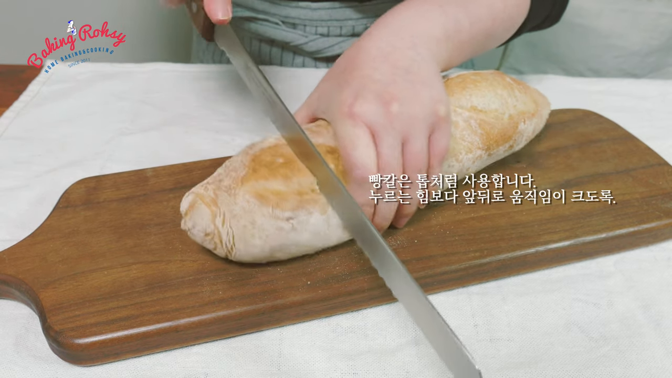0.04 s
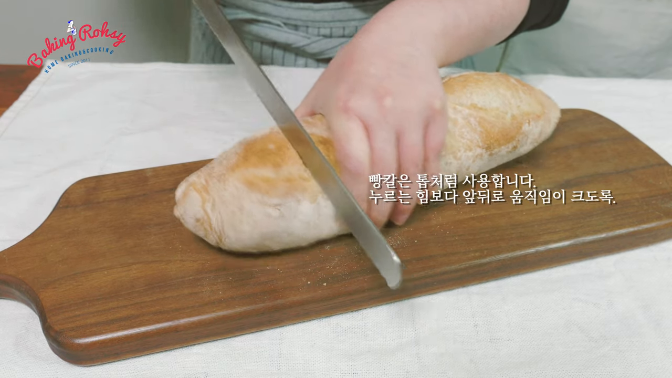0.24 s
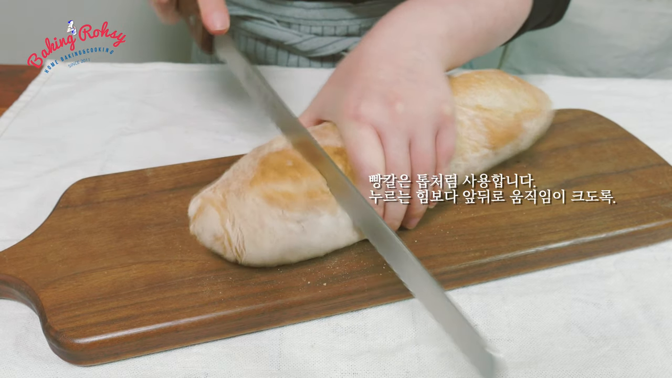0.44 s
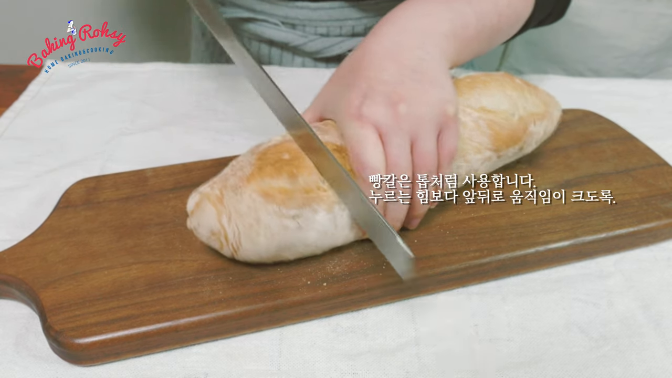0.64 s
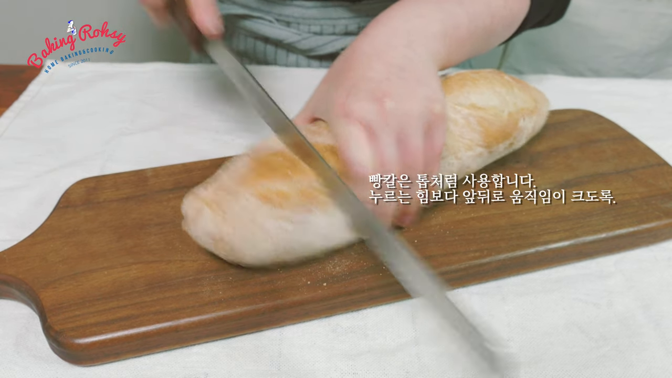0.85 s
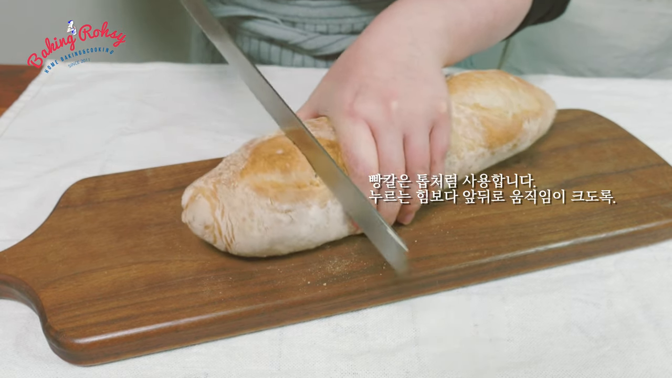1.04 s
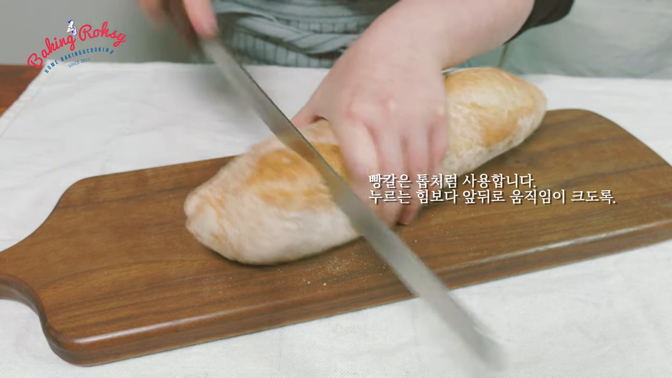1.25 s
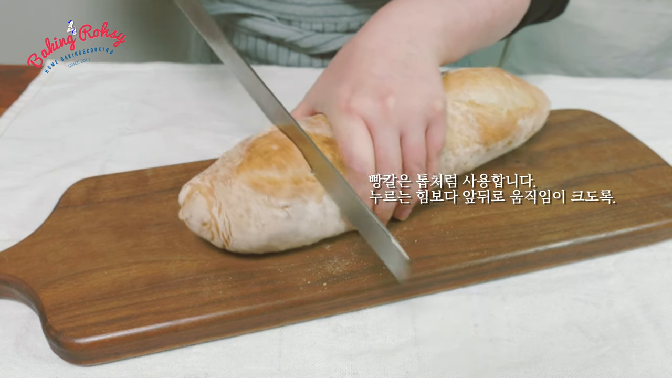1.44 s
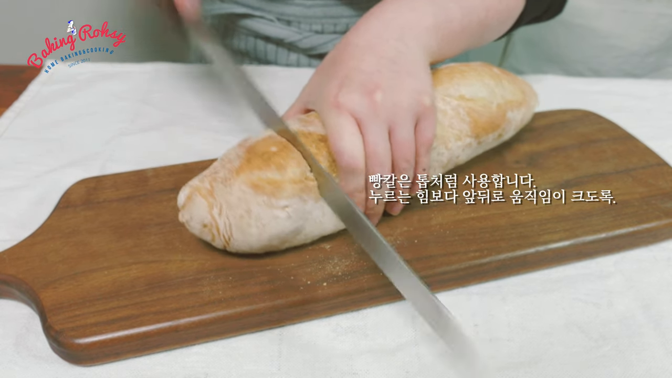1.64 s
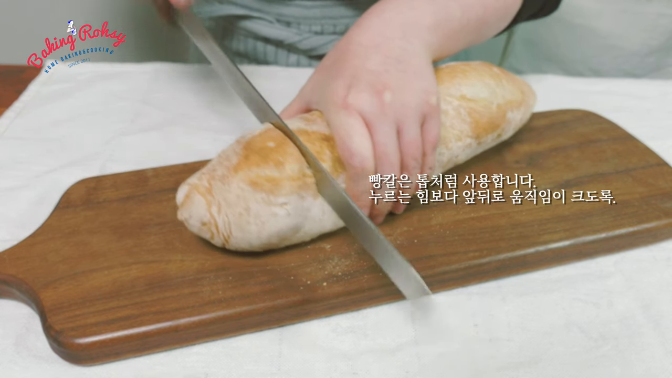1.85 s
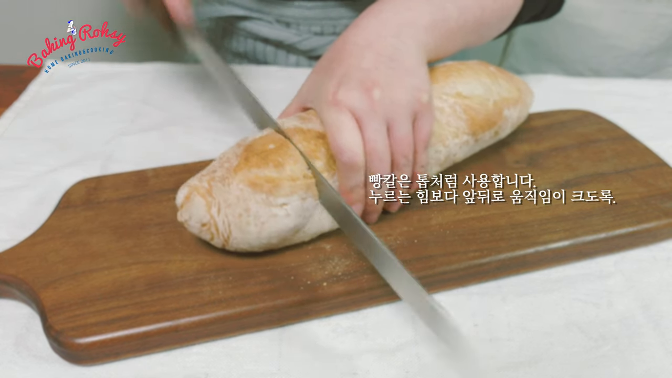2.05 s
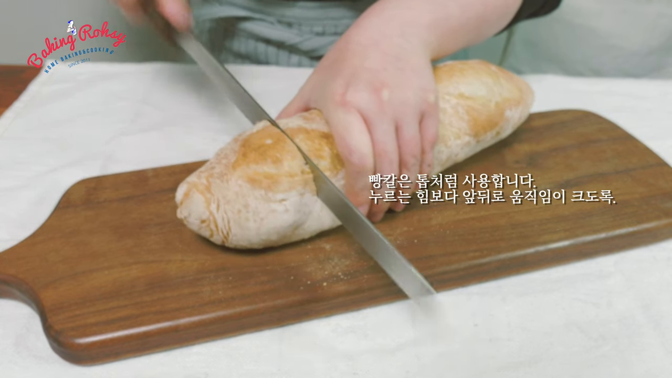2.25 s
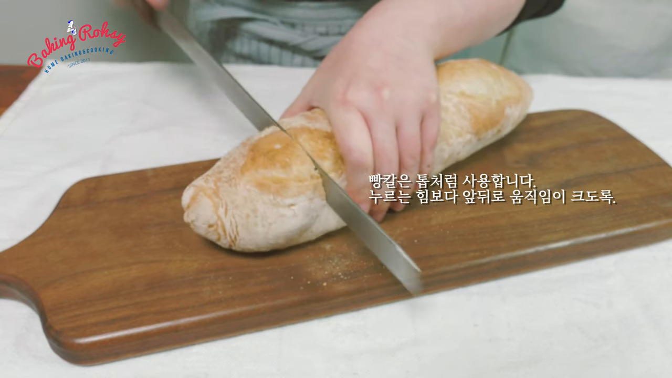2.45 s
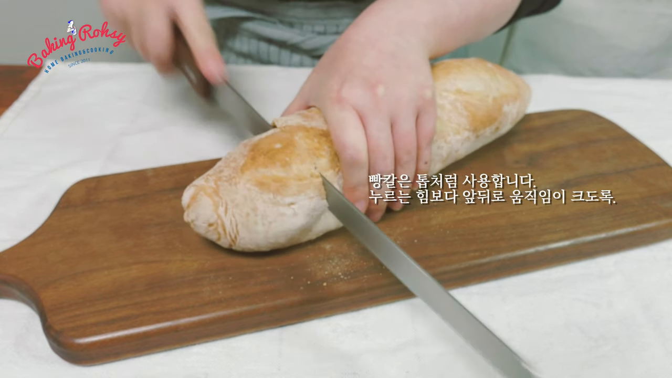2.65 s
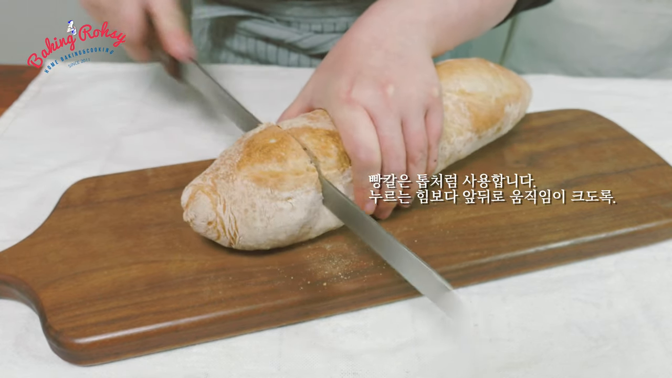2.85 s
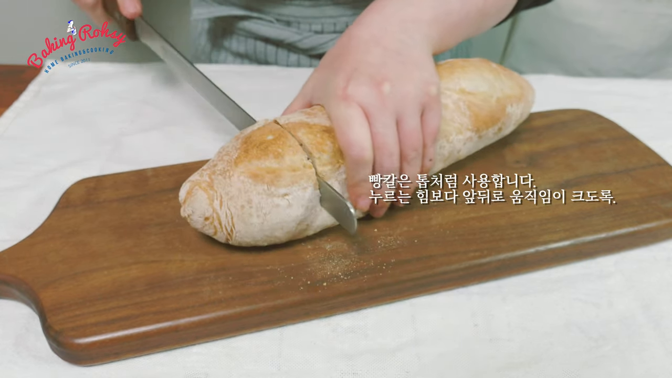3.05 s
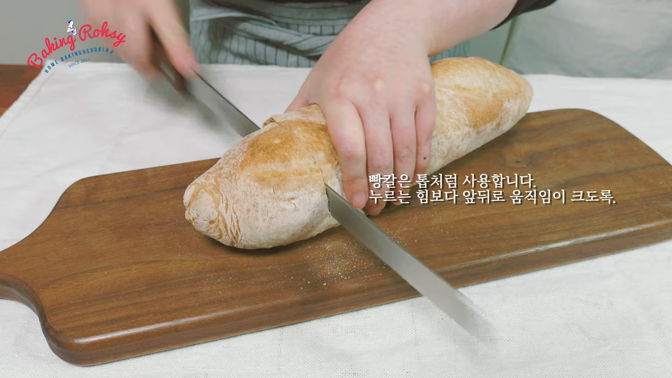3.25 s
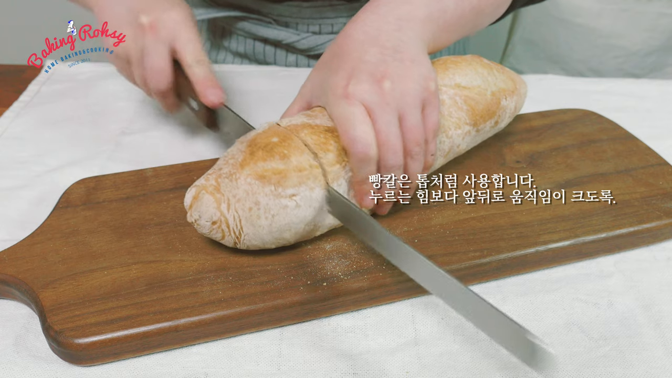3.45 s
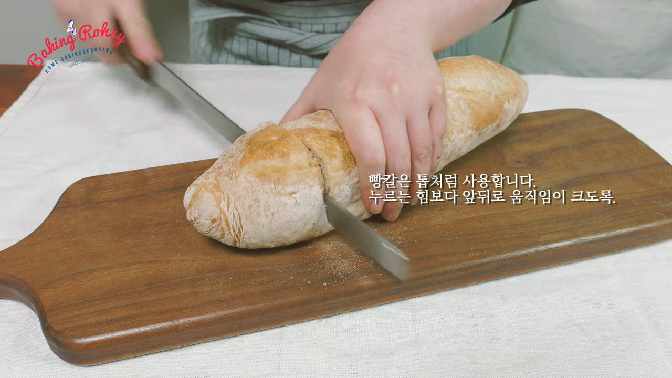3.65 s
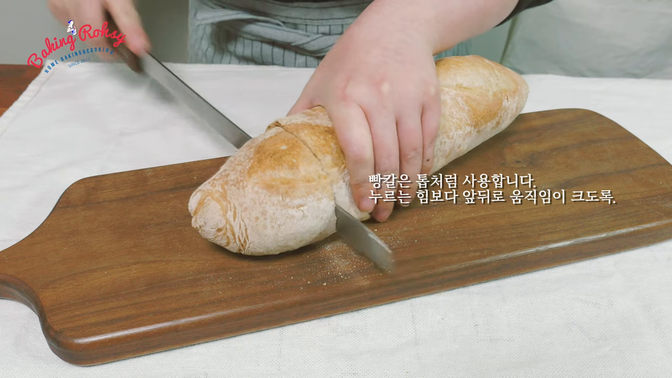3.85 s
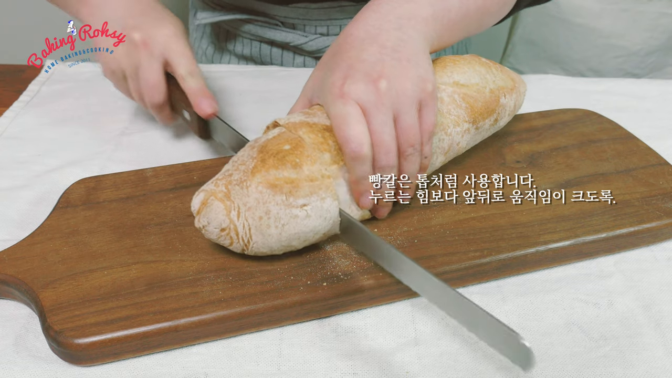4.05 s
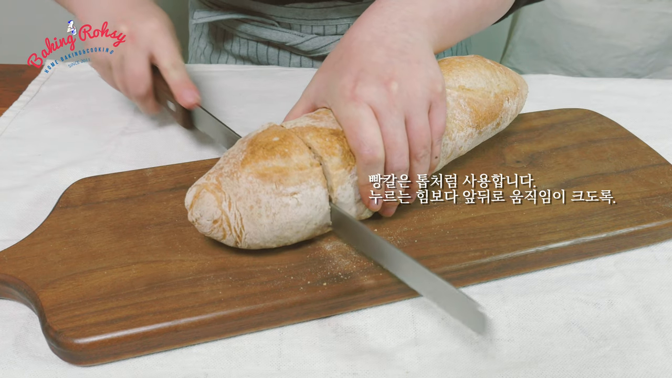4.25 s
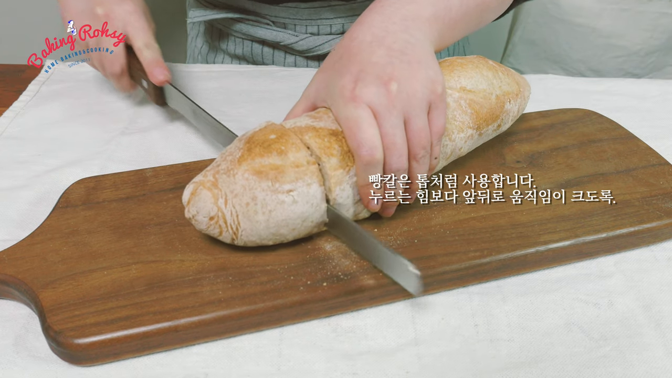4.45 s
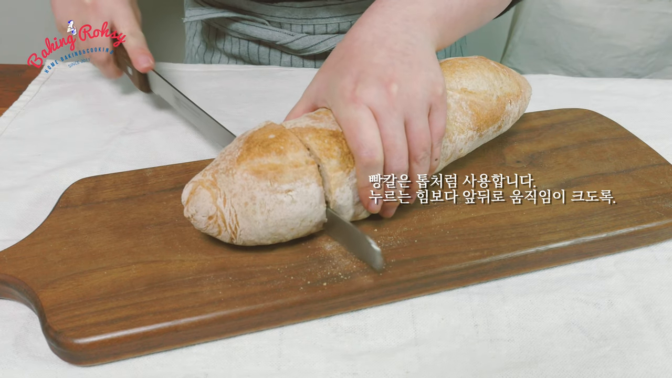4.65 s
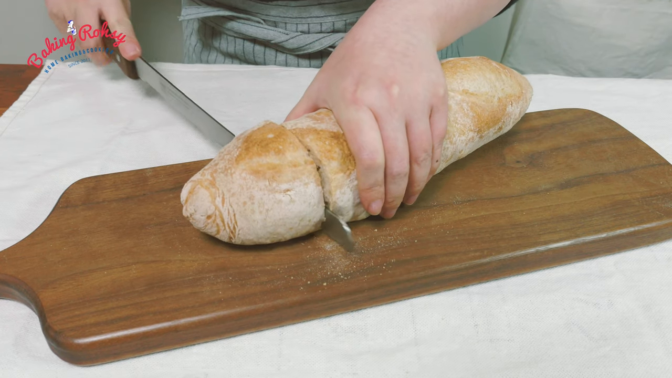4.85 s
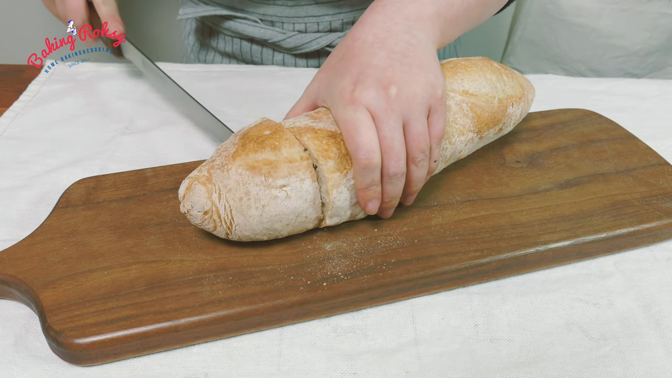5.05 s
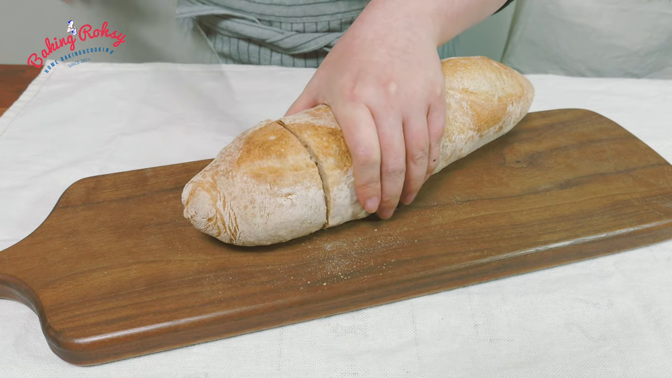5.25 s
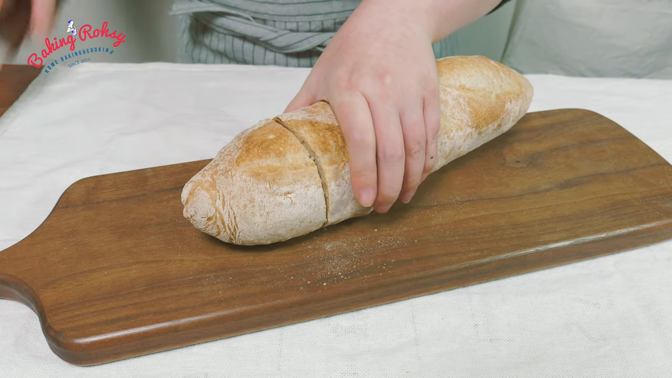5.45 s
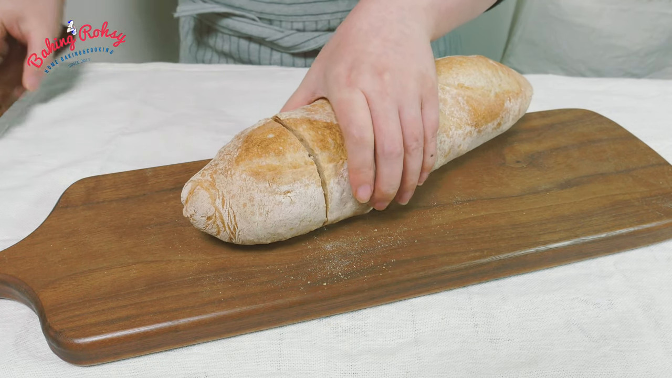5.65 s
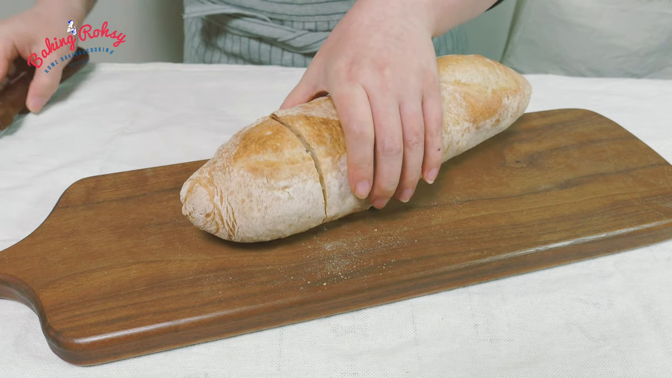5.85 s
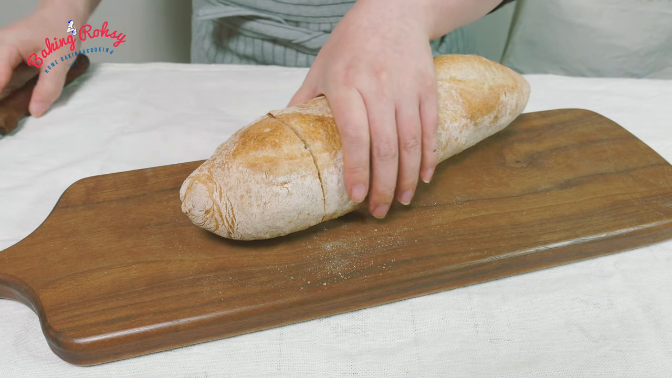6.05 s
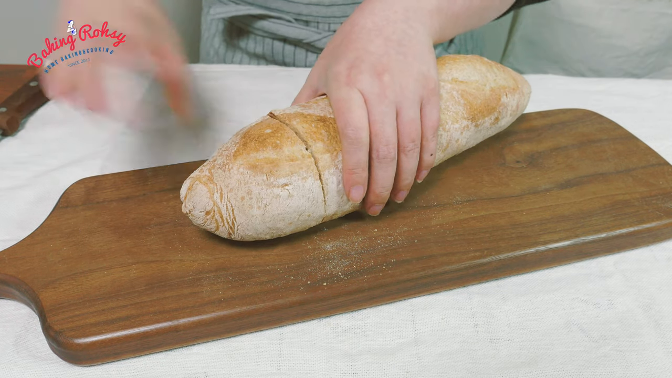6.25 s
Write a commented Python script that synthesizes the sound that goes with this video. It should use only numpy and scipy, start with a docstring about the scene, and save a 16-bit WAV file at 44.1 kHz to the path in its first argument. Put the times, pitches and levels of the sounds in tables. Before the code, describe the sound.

A serrated knife saws through a crusty loaf with rasping, crackling strokes, then is laid on the table with two ringing knocks.

```python
"""A serrated knife saws through a crusty loaf on a wooden board, close by in a small kitchen.
Its teeth catch and let go, making tiny breaks that rasp in the crust and shake the loaf and board.
Short strokes crack the crust, longer ones rasp through the loaf. Then the blade slides out, fingers
rustle on the crust, and the knife is laid down with two ringing knocks.
The sound arrives twice, a few milliseconds apart, which makes it hollow."""
import sys
import numpy as np
from scipy import signal
from scipy.fft import rfft, irfft
from scipy.io import wavfile

SR = 44100
rng = np.random.default_rng(int(sys.argv[2]) if len(sys.argv) > 2 else 0)


def log_audio(samples):
    """Write samples as a 16-bit WAV file to the path given in sys.argv[1]."""
    # one column per channel
    frames = np.atleast_2d(samples).T
    # limit to full scale, then quantise
    limited = np.clip(frames, -1, 1)
    pcm = np.round(limited * 32767).astype(np.int16)
    wavfile.write(sys.argv[1], SR, pcm)


N = 278271
TIME, HZ = np.arange(N) / SR, np.fft.rfftfreq(8192, 1 / SR)

# Tone colours, as the strength of each pitch: f/Hz, level/dB
BACKGROUND_TONE = [(25, -18), (70, -11.5), (130, 7), (200, 4), (290, 5.5), (400, 4), (550, 10.5),
                   (720, -3.5), (1000, -4.5), (1600, -10), (3000, -20), (6000, -30), (10000, -36),
                   (14000, -47)]  # the quiet kitchen
CLATTER_TONE = [(60, -10), (150, -1.5), (300, -0.5), (1000, 8), (1300, 3), (1600, 6.5), (2000, 1.5),
                (3000, 3.5), (3800, -0.5), (5500, -7.5), (6500, -5.5), (9000, -11.5), (11000, -16.5),
                (14000, -45)]  # the struck table
CRUMB_TONE = [(30, -23), (90, -6.5), (160, -0.5), (250, -6.5), (500, 6.5), (650, 10), (850, -0.5),
              (1500, -51.5)]  # the soft inside of the loaf
CRUST_TONE = [(350, -17.5), (600, -4), (770, 2), (870, 3), (930, 1.5), (1040, 1), (1200, -0.5), (1850, -2),
              (2100, -1), (3000, -0.5), (3700, -6.5), (4400, -20), (5300, -24.5), (8000, -58)]  # tearing crust
FIZZ_TONE = [(2500, -44), (3900, 0.5), (4700, 1.5), (5600, -3), (6500, 0.5), (7600, -6.5), (8800, -5.5),
             (9400, -9.5), (10300, -7.5), (11500, -16), (12500, -21), (13000, -40), (14200, -21)]  # fine crumbs
FLAKE_TONE = [(80, -29), (300, -14.5), (900, 14), (2000, 13), (3200, 13), (4500, 3), (8000, -12),
              (14000, -40)]  # a breaking flake
# How long the room takes to fade by 60 dB: f/Hz, fade/s
ROOM_FADE = [(150, 0.11), (600, 0.18), (3000, 0.15), (8000, 0.071), (14000, 0.055)]
# Strength of the echoes from the sides: f/Hz, level/dB
SIDE_ECHOES = [(60, -10), (140, -11.5), (280, -16), (550, -27.5), (850, -33), (1400, -12.5), (2100, -16.5),
               (2600, -26), (3400, -15.5), (4300, -19), (5100, -13), (6100, -20), (7100, -16.5),
               (12000, -6)]
# Fingers shift on the crust: t/s, half length/s, level/dB
FINGER_SHIFTS = [(5.428, 0.055, -65), (5.533, 0.032, -60), (5.77, 0.08, -68.5), (5.957, 0.041, -64.5),
                 (6.232, 0.073, -70)]
# The knife hits the table: t/s, ring/dB, clatter/dB, place along the knife (0 to 1)
KNIFE_HITS = [(5.613, -20.5, -29, 0.2), (5.6227, -27.5, -42, 0.34), (6.041, -22.5, -28.5, 0.97),
              (6.0532, -41, -38, 0.4), (6.095, -32.5, -39, 0.97), (6.1016, -58, -36.5, 1),
              (6.126, -38.5, -45, 0.2)]
# Its notes: f/Hz, time to fade by 60 dB/s, level if hit at one end/dB, at the other end/dB
KNIFE_NOTES = [(275, 0.093, -10.5, -20.5), (378, 0.19, -15.5, -27), (457, 0.093, -20, -11.5),
               (749, 0.14, -9.5, -28), (1036, 0.15, -8, -15), (1063.4, 0.15, -4.5, -6),
               (1105, 0.09, -16, -7), (1150, 0.21, -21, -10), (1490, 0.063, -17, -6),
               (1553, 0.074, -31, -9), (1690, 0.08, -14, -7), (1860, 0.48, -38, -26),
               (2410, 0.058, -3, -29), (2560, .17, -27, -12), (2800, 0.057, 3, -24),
               (3070, 0.16, -29, -4.5), (3388, 0.046, -11, -1.5), (3450, 0.055, -20, -6),
               (4220, 0.076, -35, -18), (6350, 0.039, -15, -17)]
# Pitches that ring during sawing: f/Hz, width/Hz, level/dB
BOARD_NOTES = [(189, 12.6, -1), (290.4, 29.4, 5), (334.3, 23, 9), (410, 40, -8), (504, 21, -8),
               (562.7, 23, -1.5)]  # loaf and board
BLADE_NOTES = [(759, 49, 0), (880, 6.8, -22), (1025, 22, 1), (1017, 8.6, 3), (1419, 21, 3.5),
               (1545, 6.9, 3.5), (1900, 4.8, 0), (1838, 48, -2.5), (2530, 17, -22.5), (2960, 27, 2.5),
               (3430, 20, -10)]  # the blade
# The blade sticks and the loaf groans: t/s, half length/s, f/Hz, level/dB
BLADE_SNAGS = [(.068, .008, 559, -34), (0.075, 0.024, 426, -39), (.495, 0.024, 446, -42),
               (.887, 0.026, 1590, -34.5), (.90, 0.024, 505, -42), (1.308, 0.026, 256, -39),
               (1.754, 0.023, 233, -44.5), (1.76, .02, 174, -47), (1.955, 0.021, 540, -40),
               (2.189, 0.033, 266, -51), (2.20, 0.027, 180, -44), (2.66, .035, 537, -40),
               (3.0, .021, 540, -40), (3.66, 0.05, 833, -35), (3.781, .029, 302, -40),
               (3.989, 0.032, 277, -41), (4.03, .06, 190, -41.5), (4.07, 0.024, 280, -38),
               (4.122, .027, 330, -38), (4.495, 0.0094, 543, -39), (4.8, .014, 880, -44),
               (4.868, 0.014, 780, -45.5), (4.992, 0.0089, 1180, -39.5), (5.109, .0082, 900, -40),
               (5.483, .012, 536, -52)]
# Large flakes of crust snap: t/s, peak/dB
FLAKE_SNAPS = [(.0235, -22), (.067, -19), (.080, -12), (.096, -22), (.4245, -29), (.4405, -24),
               (.4595, -15), (.463, -17), (.506, -19.5), (.8625, -22), (.8725, -20), (1.2545, -24),
               (1.265, -25), (1.290, -23), (1.5573, -18), (1.5738, -21), (1.662, -26), (1.698, -16),
               (1.701, -19), (2.8215, -30), (3.2085, -26), (3.459, -27), (4.0637, -21), (4.5225, -22)]
# The teeth catch on a ridge of crust: t/s, extra force compared with the stroke/dB
RIDGE_CATCHES = [(0.022, -7), (.063, -9), (.425, 4), (0.456, -3), (0.498, -7), (0.647, -5), (1.256, -5),
                 (1.553, 1.5), (1.661, -7), (1.696, 3), (2.992, -9), (3.325, -19), (3.461, 0), (4.489, 1),
                 (4.938, 0), (5.105, 5)]
# Knife strokes: start/s, length/s, speeding up/s, braking/s, drop in pressure over the stroke/dB,
# drag on the loaf/dB, crust rasp/dB, crumb fizz/dB, push on the board/dB
SAW_STROKES = [(-0.01, 0.19, 0.08, 0.17, 6, -31.5, -28, -38, -3.5),
               (0.155, 0.29, 0.12, 0.1, 21, -44.5, -44, -53, -6),
               (0.403, 0.23, 0.069, 0.21, -1.5, -36, -32.0, -41, 7),
               (0.583, 0.263, 0.11, 0.24, 5, -38, -37, -45, -9),
               (0.809, 0.21, 0.092, 0.19, -6, -31.5, -29.5, -37, -2),
               (0.994, 0.32, 0.092, 0.18, 21.5, -46.5, -42.0, -49, -2.5),
               (1.225, 0.22, 0.073, 0.129, -4.5, -36.5, -34, -43.5, -1.5),
               (1.402, 0.27, 0.077, 0.12, -2, -49.5, -43.5, -50.5, 0),
               (1.622, 0.24, 0.081, 0.1, 4, -41, -37.5, -47, -6),
               (1.809, 0.28, 0.1, 0.15, -6, -47, -41, -48.5, 10),
               (2.045, 0.24, 0.1, 0.097, -11, -41.5, -40.5, -50.0, 1.5),
               (2.264, 0.27, 0.075, 0.1, 21.5, -43, -39, -45, -6.5),
               (2.495, 0.34, 0.089, 0.086, 5.5, -46.5, -40, -46, 3),
               (2.807, 0.37, 0.079, 0.15, 3.5, -39.5, -37, -45.5, -5),
               (3.168, 0.38, 0.14, 0.066, 19.5, -43, -34, -41.5, 0.5),
               (3.523, 0.39, 0.11, 0.13, 18, -39.5, -34.5, -43.5, -2.5),
               (3.866, 0.37, 0.13, 0.136, 11, -40.5, -34.5, -44, -3.5),
               (4.215, 0.68, 0.17, 0.036, 21, -45, -36, -48.0, -5.5),
               (4.874, 0.31, 0.063, 0.1, -8, -52, -46.5, -59, -3.5),
               (5.134, 0.26, 0.032, 0.12, -16, -60, -54.5, -64, -4)]


def amp(db):
    """Turns decibels into a multiplier."""
    return 10 ** (np.asarray(db) / 20)


def evened(x):
    """Scales to an average strength (rms) of 1."""
    return x / np.sqrt(np.mean(x ** 2) + 1e-20)


def read(points, hz):
    """Reads between a table's rows on a logarithmic frequency scale."""
    f, value = np.transpose(points)
    return np.interp(np.log(hz + 1), np.log(f + 1), value)


def add(mix, s, sound):
    """Mixes a sound in at s seconds."""
    part = mix[max(round(s * SR), 0):][:len(sound)]
    part += sound[:len(part)]


def convolve(x, response):
    """Lets every sample of x set off the response."""
    return signal.oaconvolve(x, response)[:len(x)]


def ring(gain):
    """How an object with this gain at each frequency answers a tap, scaled to energy 1."""
    log_gain = np.log(np.maximum(gain, 1e-5))
    mirrored = np.r_[log_gain, log_gain[-2:0:-1]]
    response = np.fft.ifft(np.exp(np.conj(signal.hilbert(mirrored)))).real
    return response / np.linalg.norm(response)


def colour(points):
    """A click with the given tone colour."""
    return ring(amp(read(points, HZ)))


def resonance(notes):
    """A tap that rings at a few pitches and dies away."""
    power = sum(amp(db) ** 2 / (1 + ((HZ - hz) / width) ** 2) ** 2 for hz, width, db in notes)
    return ring(np.sqrt(power))


def wander(hz):
    """A smooth random wobble, up to about hz."""
    f = np.fft.rfftfreq(N, 1 / SR)
    return evened(irfft(rfft(rng.standard_normal(N)) * np.exp(-(f / hz) ** 2), N))


def background():
    """The kitchen's steady low noise, wavering a little."""
    noise = rng.standard_normal(N) * amp(0.63 * wander(hz=35))
    return amp(-60) * convolve(noise, colour(BACKGROUND_TONE))


def room_echoes(x, per_s=3000):
    """The kitchen throws back scattered echoes; the treble dies first."""
    t = np.arange(SR // 2) / SR
    echoes = rng.choice([-1., 1.], len(t)) * (rng.random(len(t)) < per_s / SR) * (t > .005)
    hz, age, spectrum = signal.stft(echoes, SR, nperseg=256)
    fade = amp(-60 * age / read(ROOM_FADE, hz)[:, None])
    tail = signal.istft(spectrum * fade, SR, nperseg=256)[1]
    return convolve(x, tail / np.linalg.norm(tail))


def second_arrival(x, share=0.51, delay_samples=166, edge_hz=9100):
    """A late, duller copy weakens some pitches, so the sound turns hollow."""
    late = signal.firwin(2 * delay_samples + 1, edge_hz, fs=SR)
    return (x + share * convolve(x, late)) / np.sqrt(1 + share ** 2)


def fingers():
    """Skin rustles faintly on the crust with each shift of the grip."""
    shifts = sum(amp(db) * np.exp(-((TIME - s) / half_s) ** 2 / 2) for s, half_s, db in FINGER_SHIFTS)
    touch = rng.standard_normal(N) * amp(2 * wander(hz=59.7)) * shifts
    return convolve(touch, colour(CRUST_TONE)) + amp(-6.5) * convolve(touch, colour(FIZZ_TONE))


def hand_bump(s=6.228, half_s=0.027, db=-53):
    """A soft low bump as the hand leaves the knife."""
    push = rng.standard_normal(N) * np.exp(-((TIME - s) / half_s) ** 2)
    return amp(db) * convolve(push, resonance([(265, 19, -5), (433, 28, -8)]))


def knocks(clatter_s=0.12, rise_s=0.00056):
    """Each hit makes the knife ring and the table clatter briefly."""
    out, t = np.zeros(N), np.arange(SR // 3) / SR
    for s, ring_db, clatter_db, place in KNIFE_HITS:
        ringing = np.zeros(len(t))
        for k, (hz, fade_s, a_db, b_db) in enumerate(KNIFE_NOTES):
            level = amp(a_db + place * (b_db - a_db) - 60 * t / fade_s)
            ringing += (-1) ** k * level * np.sin(2 * np.pi * hz * t)  # neighbours swing opposite ways
        burst = rng.standard_normal(len(t)) * amp(-60 * t / clatter_s)
        clatter = convolve(burst, colour(CLATTER_TONE))
        onset = 1 - np.exp(-t / rise_s)
        add(out, s, (amp(ring_db) * ringing + amp(clatter_db) * clatter) * onset)
    return out


def snags(sharpness=11):
    """Rubbing swells into a hollow groan whose pitch depends on where the blade sticks."""
    out, t = np.zeros(N), np.arange(SR // 2) / SR
    for s, half_s, hz, db in BLADE_SNAGS:
        rub = rng.standard_normal(len(t)) * np.exp(-(t / half_s - 2.5) ** 2 / 2)
        groan = convolve(rub, resonance([(hz, hz / sharpness, 0)]))
        groan *= np.sqrt(2 * half_s * SR) / np.linalg.norm(groan)
        add(out, s - 2.5 * half_s, amp(db) * groan)  # the rub peaks at s
    return amp(-2) * out


def snaps(splinter_db=-14, splinter_s=0.0037):
    """A breaking flake gives one sharp click and a brief shower of splinters."""
    out, click, t = np.zeros(N), colour(FLAKE_TONE), np.arange(SR // 10) / SR
    for s, db in FLAKE_SNAPS:
        splinters = rng.standard_normal(len(t)) * (rng.random(len(t)) < 3000 / SR)
        shower = amp(splinter_db) * splinters * np.exp(-t / splinter_s)
        crack = convolve((t == 0) + shower, click)
        add(out, s, amp(db) * crack / abs(crack).max())
    return out


def tiny_breaks(per_s, spread_db, grip):
    """Random clicks of uneven size, stronger where the teeth grip."""
    size = amp(spread_db * np.minimum(rng.exponential(1, N), 4.5))
    return evened(grip * size * rng.choice([-1., 1.], N) * (rng.random(N) < per_s / SR))


def chips(db=-8, fade_db_per_s=2.1):
    """Single teeth flick small chips off the crust, more softly as the cut deepens."""
    _, rasp, _ = blade_motion()
    flicks = tiny_breaks(per_s=140, spread_db=4, grip=1) * rasp * amp(db - fade_db_per_s * TIME)
    return convolve(flicks, colour(FLAKE_TONE))


def crust_patches(x, span_hz, span_s, depth_db=2):
    """Each piece of crust has its own pitch, so the tone shifts as the tear moves on."""
    spectrum = signal.stft(x, SR, nperseg=256, noverlap=192)[2]
    bins, frames = spectrum.shape
    across, along = np.fft.fftfreq(bins, SR / 256)[:, None], np.fft.fftfreq(frames, 64 / SR)
    blur = np.exp(-(across * span_hz) ** 2 - (along * span_s) ** 2)
    patches = np.fft.ifft2(np.fft.fft2(rng.standard_normal(spectrum.shape)) * blur).real
    gain = evened(amp(depth_db * evened(patches)))
    return signal.istft(spectrum * gain, SR, nperseg=256, noverlap=192)[1][:N]


def board_pressure():
    """How hard the blade pushes on the board, gliding from one mid-stroke to the next."""
    start, length, *_, push_db = np.transpose(SAW_STROKES)
    return amp(np.interp(TIME, start + length / 2, push_db))


def surges(fade_s=0.0089):
    """The force on the blade jumps at each ridge of crust, then falls back."""
    return 1 + sum(amp(db) * (TIME > s) * np.exp(-abs(TIME - s) / fade_s) for s, db in RIDGE_CATCHES)


def blade_motion(brake_db=26, drag_dip_db=1):
    """Each stroke speeds up, runs on and brakes; gives the strength of drag, rasp and fizz."""
    power = np.zeros((3, N))
    anchor = 0.33  # this far into a stroke, pressure and dip leave the level unchanged
    for start, length, rise_s, brake_s, ease_db, drag_db, rasp_db, fizz_db, _ in SAW_STROKES:
        t = TIME - start
        rising = np.sin(np.pi / 2 * np.clip(t / rise_s, 0, 1)) ** 2
        braking = np.clip((t - length) / brake_s + 1, 0, 2)
        moving = (t > 0) & (braking < 2)
        speed = (rising * amp(-brake_db * braking ** 2))[moving]
        progress = np.clip(t / length, 0, 1)[moving]
        pressure_db = -ease_db * (progress - anchor)
        dip_db = drag_dip_db * (np.sin(np.pi * progress) - np.sin(np.pi * anchor))
        drag = amp(drag_db + pressure_db - dip_db) * speed ** 1.3
        rasp = amp(rasp_db + pressure_db) * speed ** 1.05
        fizz = amp(fizz_db + pressure_db) * speed ** 1.2
        power[:, moving] += np.square([drag, rasp, fizz])
    return np.sqrt(power)


def sawing():
    """Teeth catch and let go: the crust rasps, crumbs fizz, and loaf, board and blade shake."""
    drag, rasp, fizz = blade_motion() * surges()
    drag = drag * amp(0.87 * wander(hz=21.9))  # the soft inside drags unevenly
    catch = wander(hz=190)
    cracks = tiny_breaks(per_s=6000, spread_db=2, grip=amp(1.3 * catch))
    dust = tiny_breaks(per_s=9000, spread_db=2.5, grip=amp(0.28 * catch))
    jerks = tiny_breaks(per_s=2500, spread_db=2, grip=amp(2.86 * catch))
    tugs = evened(0.5 * cracks + jerks) * drag
    push = board_pressure()
    shake = tugs / np.sqrt(1 + push ** 2)  # pushing harder moves energy into the low notes
    low_wood = amp(1.5) * convolve(shake * push, resonance(BOARD_NOTES[:3]))
    high_wood = amp(-2.5) * convolve(shake, resonance(BOARD_NOTES[3:]))
    loaf = amp(-1.5) * convolve(tugs, colour(CRUMB_TONE))
    tearing = crust_patches(cracks, span_hz=704, span_s=0.047) * rasp
    crust = amp(-0.5) * convolve(tearing, colour(CRUST_TONE))
    ticks = tiny_breaks(per_s=2500, spread_db=-1.5, grip=amp(1.6 * catch)) * rasp
    blade = amp(-13) * convolve(ticks, resonance(BLADE_NOTES))
    shedding = crust_patches(evened(0.68 * cracks + dust), span_hz=900, span_s=0.014) * fizz
    crumbs = amp(-0.36) * convolve(shedding, colour(FIZZ_TONE))
    return low_wood + high_wood + loaf + crust + blade + crumbs


def scene():
    """Bread and knife sit in the middle; echoes and background spread to the sides."""
    bread = sawing() + chips() + snaps() + snags() + fingers()
    knife = knocks() + hand_bump()
    to_room = bread + amp(3) * knife
    middle = second_arrival(bread + knife + background() + amp(-15) * room_echoes(to_room))
    side_gain = amp(read(SIDE_ECHOES, np.fft.rfftfreq(N, 1 / SR)))
    side = irfft(side_gain * rfft(room_echoes(to_room)), N) + amp(-1.5) * background()
    return np.array([middle + side, middle - side])


def record(dry):
    """Cuts the treble above 14200 Hz."""
    treble_cut = signal.firwin(511, 14200, window=("kaiser", 9), fs=SR)
    return signal.oaconvolve(dry, treble_cut[None], "same")


dry = scene()
out = record(dry)
log_audio(out)
```